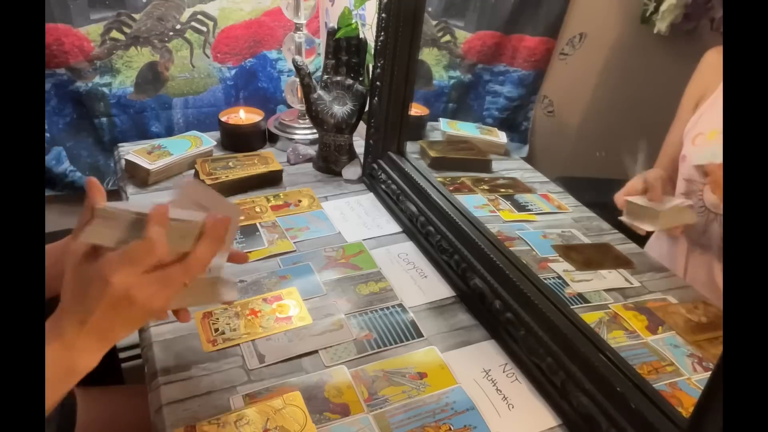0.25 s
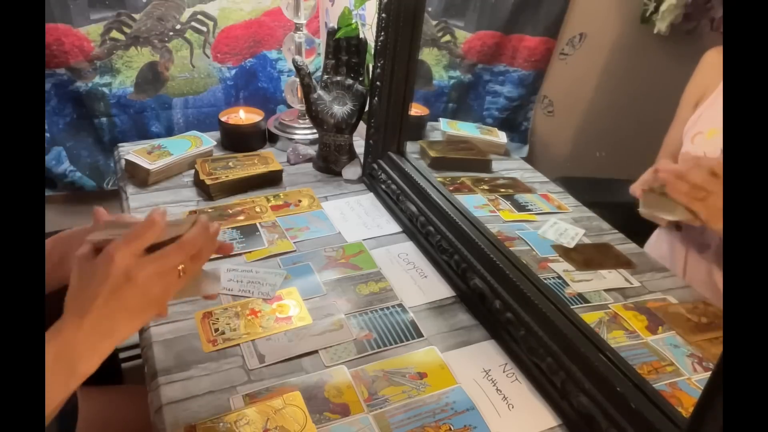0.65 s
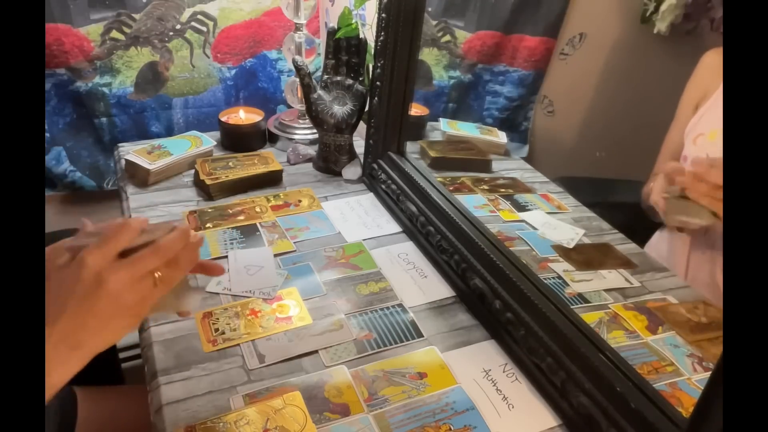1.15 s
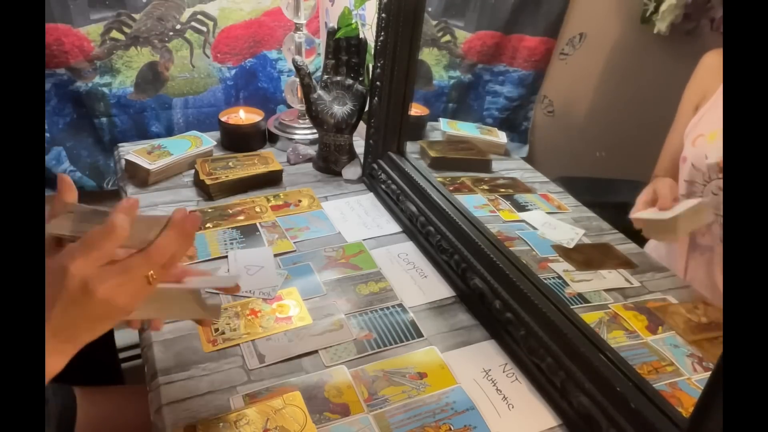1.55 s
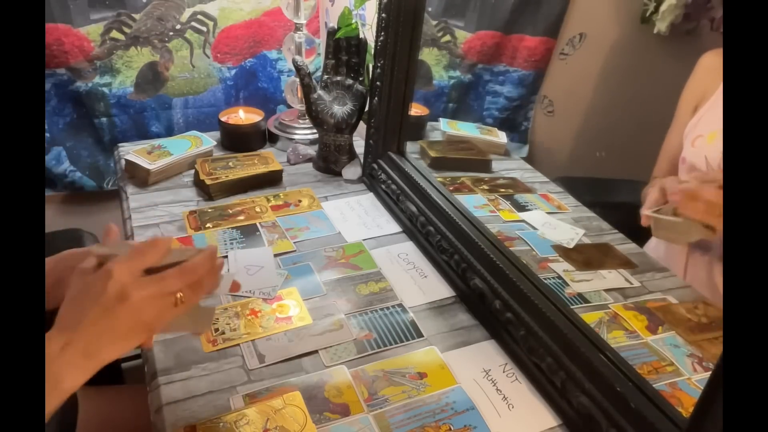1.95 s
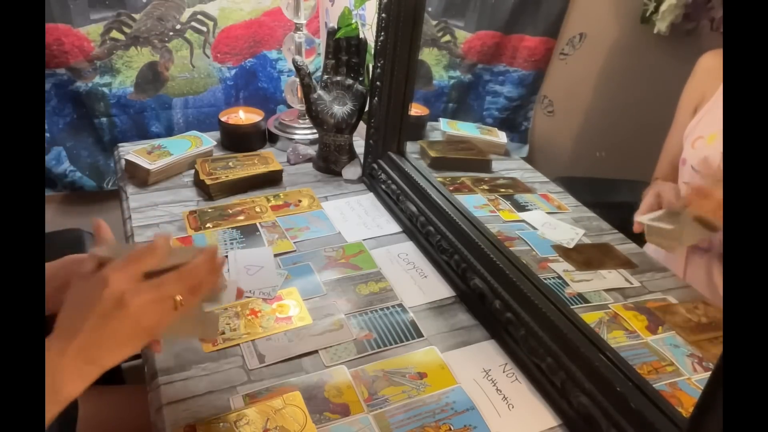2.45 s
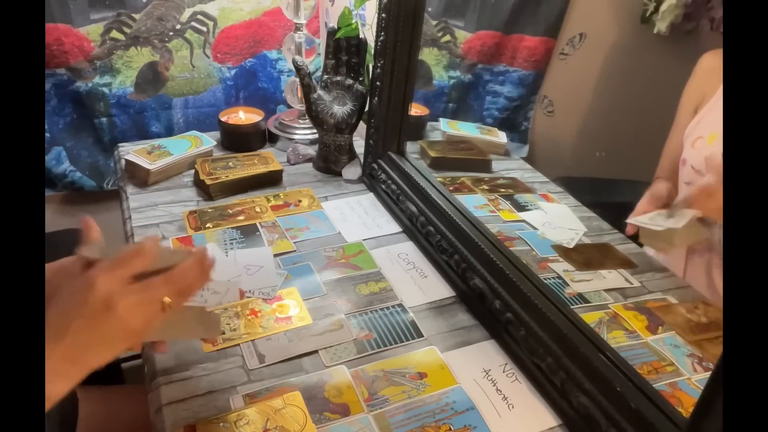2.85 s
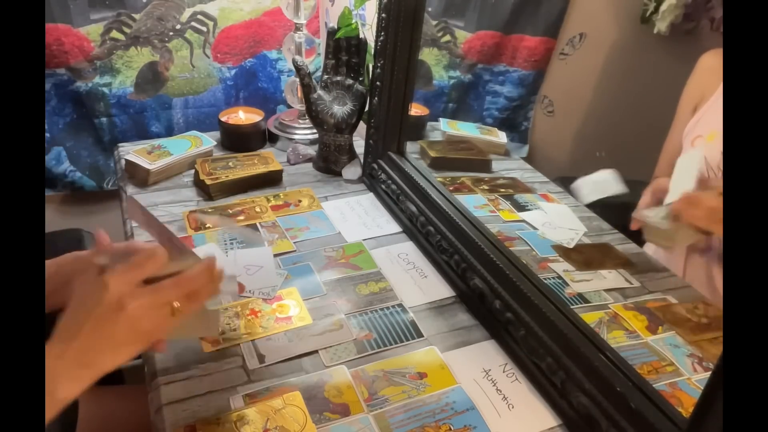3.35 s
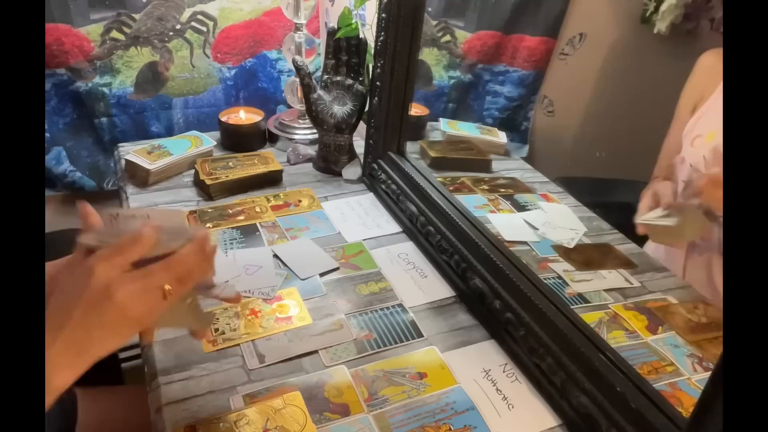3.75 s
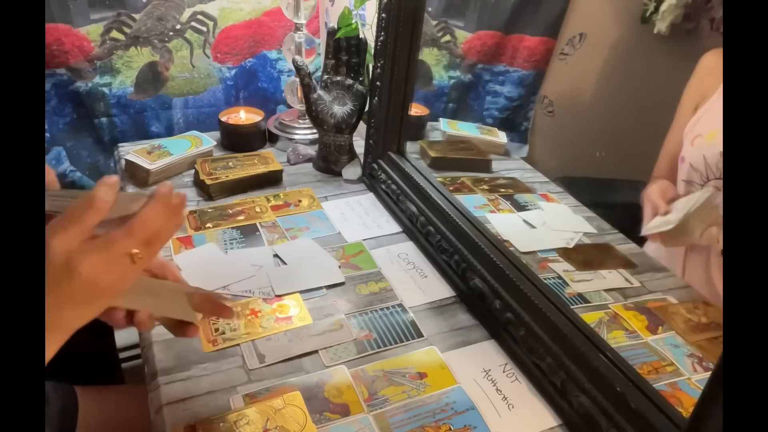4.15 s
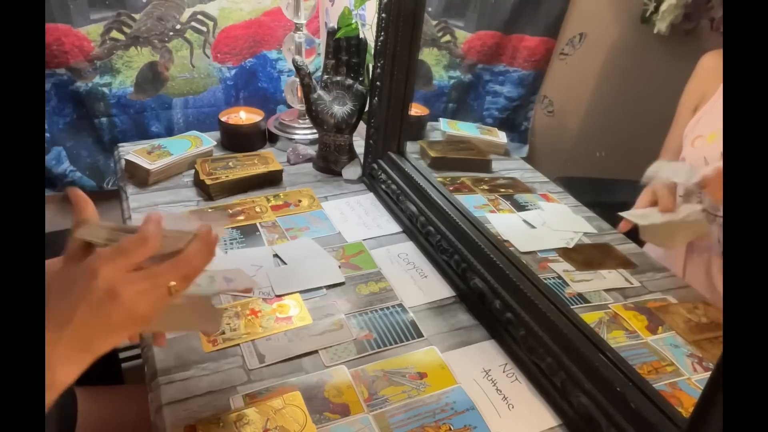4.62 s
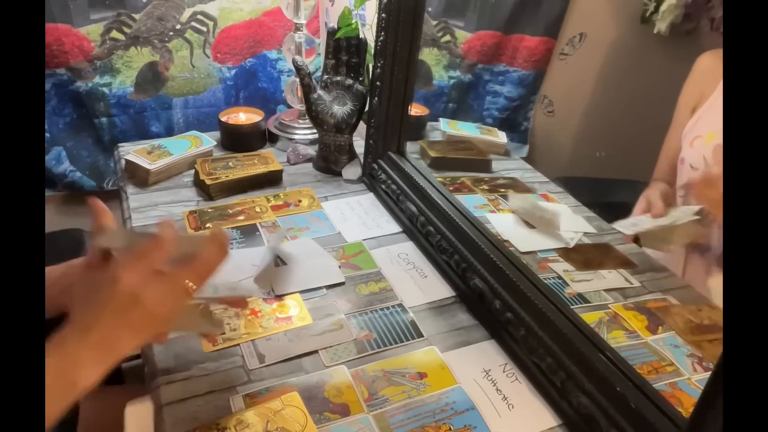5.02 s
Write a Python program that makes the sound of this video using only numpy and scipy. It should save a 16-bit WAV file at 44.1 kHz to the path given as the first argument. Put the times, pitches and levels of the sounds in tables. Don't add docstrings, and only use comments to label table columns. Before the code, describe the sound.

Hands work a deck of big cards: finger grip, scratchy slide, crisp slap, over and over at about four a second. Slaps are papery and mid-pitched with bright edge snaps and a faint wooden thud beneath. The handfuls thin out late, one strong crack sounds, light ticks follow, and a dull hollow knock closes. Close stereo phone pickup, short room reflections, almost no background noise.

```python
import sys
import numpy as np
from scipy import signal
from scipy.fft import rfft, irfft, next_fast_len
from scipy.io import wavfile
from scipy.ndimage import uniform_filter1d

SR = 44100
rng = np.random.default_rng(int(sys.argv[2]) if len(sys.argv) > 2 else 0)


def magnitude_from_level(level_db):
    exponent = np.asarray(level_db, float) / 20
    return 10 ** exponent


def dump(signal):
    limited = np.clip(np.atleast_2d(signal).T, -1, 1)
    pcm = np.round(limited * 32767).astype(np.int16)
    wavfile.write(sys.argv[1], SR, pcm)


N = 232888
PADDED = next_fast_len(N + 2 ** 12)
HZ = np.maximum(np.fft.rfftfreq(PADDED, 1 / SR), 1)
PLACES = 11


def at_hz(table, hz=HZ):
    table_hz, value = np.transpose(table)
    return np.interp(np.log(hz), np.log(np.maximum(table_hz, 1)), value)


def band(x, lo_hz, hi_hz, order=2):
    edges = [lo_hz, min(hi_hz, .45 * SR)]
    return signal.sosfilt(signal.butter(order, edges, "bandpass", fs=SR, output="sos"), x)


def around(x, hz, width_hz, order=2):
    return band(x, hz - width_hz / 2, hz + width_hz / 2, order)


def unit(x):
    return x / np.sqrt(np.mean(x ** 2))


def crest(x, db):
    return x * magnitude_from_level(db) / np.sqrt(uniform_filter1d(x ** 2, size=176).max())


def dying(t, t60):
    return np.exp(-np.log(1000) * t / t60)


def grit(size, spread_db):
    return rng.standard_normal(size) * magnitude_from_level(spread_db * np.minimum(rng.exponential(size=size), 3.5))


# pitch in Hz, share common to both from 0 to 1.
PORT_LIKENESS = [(60, .95), (130, 0.98), (300, 0.82), (800, 0.56), (2000, 0.51), (4000, 0.43), (6500, 0),
                 (9000, 0), (11500, 1), (15000, 0.9)]
# pitch in Hz, lead of the left port in radians.
PORT_LEAD = [(0, 0), (900, .2), (1380, .6), (2240, 2.2), (2840, 4.0), (3790, 5.4), (5000, 8.4),
             (6550, 10.4), (8500, 12.2), (12900, 12.8), (14100, 15.3), (16300, 15.9)]
# pitch in Hz, left minus right in dB.
PORT_TILT = [(60, .5), (200, 2), (380, 4), (700, 6), (1290, 1.5), (2380, -2.5), (4400, 0), (6000, 3),
             (8120, 0)]


def ports(common, left, right):
    share = np.clip(at_hz(PORT_LIKENESS), 0, 1)
    lead = np.interp(HZ, *np.transpose(PORT_LEAD))
    half = magnitude_from_level(at_hz(PORT_TILT) / 2) * np.exp(.5j * lead)
    pair = np.sqrt(share) * common + np.sqrt(1 - share) * np.array([left, right])
    return irfft(pair * np.array([half, 1 / half]), PADDED)[:, :N]


# pitch in Hz, density in dB per Hz.
FLOOR_COLOUR = [(24, -40), (40, 10.5), (108, -20), (1170, -30.5), (1460, -21), (1610, -38.5), (4450, -28.5),
                (15000, -36)]


def room_tone():
    noise = rfft(rng.standard_normal((3, N)), PADDED) * magnitude_from_level(at_hz(FLOOR_COLOUR))
    return unit(ports(*noise)) * magnitude_from_level(-72)


# pitch in Hz, time to fall 60 dB in seconds.
ROOM_DECAY = [(100, 0.23), (500, 0.24), (2000, 0.26), (5000, 0.25), (12000, 0.23312)]
# pitch in Hz, late sound against direct in dB.
ROOM_LEVEL = [(100, -3), (500, -6), (2000, -3), (5000, -2.5), (12000, -10)]


def room_response():
    t = np.arange(24000) / SR
    near = rng.standard_normal(len(t)) * dying(t, 0.047)
    wall = rng.standard_normal(len(t)) * np.exp(-abs(t * 1000 - 8.4) / 1.86)
    late = magnitude_from_level(-16) * wall / np.sqrt(np.sum(wall ** 2))
    for hz in 70 * 2. ** np.arange(8):
        shape = dying(t, at_hz(ROOM_DECAY, hz)) * np.clip(t / 0.009375, 0, 1)
        low = hz / np.sqrt(2)
        top = hz * (np.sqrt(2) if hz < 8000 else 2.2)
        noise = unit(band(rng.standard_normal(len(t)), low, top)) * np.sqrt((top - low) * 2 / SR)
        late = late + magnitude_from_level(at_hz(ROOM_LEVEL, hz)) * noise * shape / np.sqrt(np.sum(shape ** 2))
    return magnitude_from_level(-4.5) * near / np.sqrt(np.sum(near ** 2)) + late


# pitch in Hz, width in Hz, level in dB.
PANEL_BOOM = [(126.6, 24.6, 26), (154.5, 33, -11)]
# pitch in Hz, width in Hz, level against the boom in dB.
PANEL_KNOCK = [(292.46, 95, -13), (447, 68, -20), (527, 82, -6.5), (607, 78, -11.5), (1794, 240, -21)]


def panel_mode(x, hz, width_hz, db):
    return crest(band(around(x, hz, width_hz, order=1), hz - width_hz, hz + width_hz, order=1), db)


def knock():
    knock_s, boom_late_s, heel_late_s, heel_ms = 5.186, 0.014, 0.0058, 1.2
    t = np.clip(np.arange(N) / SR - knock_s, 0, None)
    corner = band(t * np.exp(-t * 1000 / heel_ms), 199.6, 6000)
    late = np.zeros(N)
    late[int((knock_s + boom_late_s) * SR)] = 1
    boom = sum(panel_mode(late, *mode) for mode in PANEL_BOOM)
    blow = corner + np.roll(corner, int(heel_late_s * SR))
    upper = sum(panel_mode(blow, *mode) for mode in PANEL_KNOCK)
    return magnitude_from_level(-33.5) * np.array([crest(boom, 0), upper])


# pitch in Hz, width in Hz, level in dB.
CARD_MODES = [(502, 120, 17), (1001, 724, 21), (1406, 470, 20), (2106, 380, 19), (3680, 810, -8.5),
              (4540, 700, -6.5)]


def card_body(x, stretch=0.77):
    return sum(magnitude_from_level(db) * around(x, stretch * hz, width, order=1) for hz, width, db in CARD_MODES)


# start in seconds, length in seconds, rub as the faces
# break loose in dB, rub once gliding in dB, edge hiss at full speed in dB.
DRAG_STROKES = [(0.105, 0.09, -58, -51, -45.5), (0.389, 0.069, -53, -45, -34.5),
                (0.29, 0.059, -74, -51.5, -59), (0.612, 0.11, -55, -52, -43.5),
                (0.729, 0.16, -32.5, -74, -56), (1.13, 0.15, -71, -55.5, -41.5),
                (1.246, 0.17, -35, -48.5, -61), (1.374, 0.14, -26, -60, -45),
                (1.664, 0.088, -47.5, -61, -41.5), (1.904, 0.14, -43, -64, -38.5),
                (2.148, 0.11, -55, -51.5, -41.5), (2.38, 0.15, -33, -60, -42),
                (2.632, 0.099, -40, -63.5, -47), (2.883, 0.083, -61.5, -45.5, -49),
                (3.124, 0.097, -45, -57, -45), (3.254, 0.088, -46, -61, -66),
                (3.346, 0.13, -41, -47.5, -56), (3.574, 0.076, -49, -74.5, -53),
                (3.673, 0.12, -34.5, -67, -43), (3.831, 0.17, -48, -58, -59.5),
                (4.027, 0.093, -47, -55.5, -51.5), (4.288, 0.081, -75.5, -56.5, -43),
                (4.505, 0.11, -48, -54, -37.5), (4.866, 0.065, -34.5, -68, -64.5),
                (5.008, 0.046, -63, -74.5, -64), (5.09, 0.028, -66, -67, -77),
                (5.149, 0.037, -69, -64, -66), (0.803, 0.055, -42, -55, -56),
                (0.872, 0.13, -36.5, -76, -38)]
# landing in seconds, rub in dB, hiss in dB.
LANDING_RUSHES = [(0.202, -38.5, -41.5), (0.4498, -35, -53), (0.726, -40.5, -41.5), (.9558, -40, -41.5),
                  (1.2587, -34, -35), (1.479, -35.5, -42.5), (1.7616, -43.5, -41), (1.998, -38, -39),
                  (2.4813, -40, -33.5), (2.736, -44.5, -45), (3.237, -43.5, -46), (3.517, -33.5, -33.5),
                  (3.776, -43.5, -48.5), (4.383, -47, -41.5), (4.609, -39, -46)]


def drag():
    loosen_db_per_s, speed_up_db, break_hiss_db, rush_swell_s = 383, 17, -29.5, 0.015
    t, rub, hiss = np.arange(N) / SR, np.zeros(N), np.zeros(N)
    for s, length, loose_db, glide_db, hiss_db in DRAG_STROKES:
        on = slice(int(s * SR), int((s + length) * SR))
        since = t[on] - s
        loose = magnitude_from_level(loose_db - loosen_db_per_s * since)
        rub[on] += loose + magnitude_from_level(glide_db)
        hiss[on] += loose * magnitude_from_level(break_hiss_db) + magnitude_from_level(hiss_db - speed_up_db * (1 - since / length))
    for s, rub_db, hiss_db in LANDING_RUSHES:
        on = slice(int(s * SR) - 2 ** 13, int(s * SR))
        rush = np.exp((t[on] - s) / rush_swell_s)
        rub[on] += rush * magnitude_from_level(rub_db)
        hiss[on] += rush * magnitude_from_level(hiss_db)
    return rub, hiss


def slide():
    rub_gain, hiss_gain = drag()
    steps = np.repeat(rng.standard_normal(N // 300 + 1), 300)[:N]
    catch = unit(uniform_filter1d(steps, size=200))
    grain = unit(band(grit(N, spread_db=6.0), 1800, 5000, order=1))
    faces = unit(card_body(grit(N, spread_db=4.0))) + magnitude_from_level(-9.5) * grain
    edges = unit(band(grit(N, spread_db=4.5), 4600, 18000))
    rub = faces * rub_gain * magnitude_from_level(np.clip(4.4 * catch, -11, 4) - 8.5)
    hiss = edges * hiss_gain * magnitude_from_level(np.clip(3.5 * catch, -8, 3) - 3.0)
    return rub + hiss


# pitch in Hz, level in dB, time to fall 60 dB in seconds.
TABLE_MODES = [(149, -9, 0.093), (193, 5.5, 0.03), (242, 9, 0.028)]


def table_top():
    t = np.arange(8192) / SR
    return sum(magnitude_from_level(db) * np.sin(2 * np.pi * hz * t) * dying(t, t60) for hz, db, t60 in TABLE_MODES)


# start in seconds, thump in dB.
PACKET_THUDS = [(.2067, -36.5), (.4482, -32), (.7281, -39), (.9564, -34.5), (1.2551, -39), (1.3627, -39.5),
                (1.3991, -37.5), (1.4811, -36.5), (1.7643, -35.5), (1.912, -50.5), (2.0, -31.5),
                (2.2486, -34.5), (2.4796, -36), (2.7372, -37.5), (2.974, -33.5), (3.237, -45.5),
                (3.52, -42.5), (3.7755, -41), (4.045, -59.5), (4.3865, -34), (4.6091, -36), (4.722, -37),
                (4.9261, -49.5), (4.96, -56), (4.943, -43.5), (4.994, -58.5), (5.016, -56), (5.044, -61)]


def add_thuds(out, lead, table):
    fade = np.exp(-np.arange(2048) / SR * 1000 / 6.1)
    for n, (s, db) in enumerate(PACKET_THUDS):
        shove = band(rng.standard_normal(2048) * fade, 32, 320)
        thud = signal.fftconvolve(shove, table)[:8192]
        out[n % PLACES, int(s * SR) + lead:][:8192] += crest(thud, db - 3.0)


# start in seconds, strength in dB, flex against it in dB,
# edge snap against it in dB, cluster length in ms.
PACKET_DROPS = [(0.2034, -36.5, 7, 4, 0.86), (0.2059, -24.5, -18, -7.5, 3.1), (0.4476, -27.5, 0, 6.5, 2.4),
                (.451, -23.5, 5.5, 7, 0.42), (0.7291, -24.5, -8, -8, 1.2), (0.7316, -35.5, -3, -16, 2.8),
                (0.9559, -22, 5, -2, 3.9), (0.961, -25.5, 5, 8, 2.8), (1.2558, -28.5, -1.5, 2, 1.5),
                (1.3588, -20.5, -1.5, -4, 3.8), (1.366, -22.5, 2.5, -6, 2.9), (1.3708, -36, -7, -12.5, 2.5),
                (1.3805, -25, 9.5, 10, 2.6), (1.3879, -33.5, 3, -17, 2.2), (1.402, -36.5, 10, -5, 3.6),
                (1.479, -26.5, 6.5, -5.5, 0.85), (1.4829, -14.5, -2.5, -8.5, 2.1),
                (1.7618, -28.5, -3, 3.5, 7), (1.7657, -20, 1, -6, 1.35), (1.9989, -19.5, -0.5, -4.5, 5.9),
                (2.004, -19, 6, -16.5, 2.2), (2.2491, -21.5, -6, -3.5, 2.4), (2.2534, -20.5, -1.5, -3, 1.9),
                (2.4793, -24.5, 1, 2, 3.3), (2.484, -28, 5.5, 11.5, 0.45), (2.737, -28, -3, 0, 3),
                (2.7426, -24.5, -7, 0, 6.2), (2.974, -23, 1.5, -11.5, 3.7), (2.9793, -20.5, -12, 10, 2.5),
                (3.238, -42, 3.5, 6, 2.2), (3.2398, -38, -5, -8, 4.3), (3.7761, -23, -2, -2.5, 2.2),
                (4.384, -35.5, 10, 10.5, 6.2), (4.39, -24, -5, 8, 0.73), (4.6095, -21.5, -7, -18.5, 0.78),
                (4.72, -19.5, -7, 2.5, 1.7), (4.724, -15.5, 0, -10.5, 2.2), (4.728, -19, -17, -9.5, 6.5)]
FURTHER_DROPS = [(.22, -32.5, -16, -25, 2.7), (0.2236, -38, -25, -18, 1.4), (0.23, -44.5, -13.5, -17.5, 4),
                 (0.3743, -33, -1, -0.5, 3), (.378, -30.5, -7, -10.5, 1.3), (0.7403, -34.5, -15, -11, 2.4),
                 (0.8054, -37, 3.5, 2, 4), (.869, -29.5, 0, -7, 6.1), (0.882, -38.5, -8.5, -16, 2.1),
                 (0.89, -43, -5, -13, 2.2), (1.522, -46, 1, 2, 5.4), (1.91, -37.5, 0, 2, 3.7),
                 (1.916, -40, 0.5, 4.5, 3.9), (1.992, -48, 4.5, 3.5, 1.7), (2.023, -34.5, -1.5, -7, 9.2),
                 (2.2803, -34, -7, -15.5, 1.3), (2.296, -42.5, -7, -6, 4.3), (2.4, -40.5, 0, 2.5, 3.4),
                 (2.409, -39.5, -4.5, 3, 1.81), (2.4104, -30.5, 4.5, -19.5, 1.7), (2.7454, -23, 0, -18, 3.3),
                 (2.909, -21.5, 0.5, 7.5, 1), (3.3562, -37.5, -14, -2.5, 1.5), (3.3606, -31, -9.5, -1.5, 2.5),
                 (3.3834, -34.5, 3, -12, 2.8), (3.4153, -34, 5, -5.5, 3.1), (3.419, -27.5, -1, -6.5, 3.6),
                 (3.518, -21, 1.5, -4, 6.9), (3.525, -25, 3.5, 9, 2.4), (3.6365, -25, -2, -12.5, 9.1),
                 (3.642, -24.5, -13.5, -7.5, 2.4), (3.648, -36.5, 6.5, 6, 7.5),
                 (3.675, -31.5, 0.5, -0.5, 1.5), (3.678, -40.5, -5, 4, 2.9), (4.523, -43.5, 0, 1.5, 4.096),
                 (4.526, -41.5, 0, -7, 2.7), (4.986, -49.5, -5, 9, 9.8), (4.993, -50.5, -14, -1, 3),
                 (5.0402, -50.5, -4.5, 12, 2.3), (5.185, -49, -14, -3.5, 2.8)]
# start in seconds, strength in dB, edge snap against it in dB,
# cluster length in ms.
FINGER_GRIPS = [(0.107, -38, -6, 2.9), (0.302, -43, -5, 1.8), (0.6161, -43, -3, 5), (0.66, -40.5, -22, 2),
                (1.1365, -42, -8, 1.6), (1.198, -49.5, 1, 14), (1.3328, -37.5, -0.5, 3.1),
                (1.67, -38.5, -11.5, 2.4), (1.7, -35, -5, 1.5), (2.151, -42, -7.5, 7.4),
                (2.381, -48, 0.5, 2.5), (2.6364, -46, 10, 4.9), (2.884, -49, -8.5, 6.7),
                (3.1265, -42, -4.5, 8.9), (3.1302, -37, -7, 2), (3.348, -48.5, -13.5, 5.2),
                (3.484, -46.5, 2.5, 6.7), (3.4895, -37, -1, 5.6), (3.8618, -49.5, -11.5, 24),
                (3.951, -44.5, -7, 11.7), (4.0424, -50, -22, 13.6), (4.2818, -50, -8, 11.66),
                (4.794, -38.5, -10, 4.6), (4.8674, -43, -4, 7.5), (4.9265, -40.5, 6, 0.95)]
# start in seconds, strength in dB, edge snap against it in dB.
CORNER_TICKS = [(0.054, -55, 11.5), (0.125, -43, 1), (0.139, -48, -13), (0.1445, -47.5, 0),
                (0.2863, -64, 12), (0.3438, -39.5, -5.5), (0.401, -51, 2), (0.4402, -46, -4),
                (0.63, -51.5, 5), (0.6416, -54.5, 6), (0.789, -57.5, 9.5), (0.846, -41, -9),
                (0.863, -50, 2), (0.939, -52.5, 9.5), (1.088, -56, 10.5), (1.1643, -55, 10.5),
                (1.305, -45.5, -14.5), (1.326, -51.5, 4), (1.427, -32, -15), (1.469, -56.5, 9.5),
                (1.604, -58, 8), (1.681, -54, 2.5), (1.81, -47.5, 9), (1.884, -57.5, 10),
                (2.187, -55.5, -5), (2.212, -50, 4), (2.4355, -49.5, -13), (2.4712, -32.5, -3.5),
                (2.536, -44.5, -11), (2.6238, -44, -4.5), (2.6567, -56, 9.5), (2.675, -56.5, 8),
                (2.787, -41, -8), (2.904, -55, 13), (3.151, -50, 3), (3.17, -48.5, 8), (3.225, -44, 0),
                (3.259, -46, 5), (3.2737, -50, 4.5), (3.598, -39, -11.5), (3.742, -46.5, 3.5),
                (3.842, -50.5, -8), (3.867, -50.5, -6), (3.929, -54, 2), (4.071, -45, -12),
                (4.08, -58.5, 14), (4.087, -58, 3), (4.409, -41, 7.5), (4.507, -47, -3), (4.548, -51.5, 0),
                (4.699, -39, -2.5), (4.709, -36, -6.5), (4.9067, -46.5, -7)]


def landings():
    tick_ms = 2.8
    touches = FINGER_GRIPS + [row + (tick_ms,) for row in CORNER_TICKS]
    light = [(s, db, -0.5 + 0.94 * edge, edge, ms) for s, db, edge, ms in touches]
    rows = []
    for s, db, flex, edge, ms in PACKET_DROPS + FURTHER_DROPS + light:
        push_db = -53.5 + 0.24 * (db + 18.5)
        rows.append((s, db, push_db, db + flex, db + edge, ms))
    return rows


# start in seconds, body in dB, thump in dB, flick in dB,
# snap in dB, cluster length in ms.
EARLIER_LANDING = (-.03, -21, -36, -17, -26, 4)
# start in seconds, ring in dB, ring in Hz,
# slow bending against the body in dB, flex in Hz.
HANDFUL_VOICES = [(0.107, -44, 1020, -13, 3280), (0.206, -29.5, 1320, -8, 3020), (0.3, -34, 880, -15, 4000),
                  (0.374, -29.5, 1650, -12.5, 5000), (0.446, -18.5, 970, -16, 3957),
                  (0.616, -51, 1520, -9.5, 3409), (0.659, -35, 1530, -14, 3640),
                  (0.728, -24.5, 1540, -8, 3780), (0.805, -44, 1410, -23, 3060),
                  (0.869, -35, 1110, -15, 4160), (0.955, -23, 1630, -8, 4400), (1.136, -39, 1480, -8, 4510),
                  (1.255, -20.5, 1950, -11.5, 4531), (1.359, -21.5, 1420, -12, 4100),
                  (1.38, -20, 855, -13, 3200), (1.478, -15, 1910, -14, 3200), (1.669, -38, 1380, -4, 4100),
                  (1.699, -36, 1455, -27, 3010), (1.759, -27.5, 1430, -10.5, 4100),
                  (1.911, -33, 1370, -7, 4560), (1.998, -26, 1060, -15, 3330), (2.152, -37, 1010, -6, 4690),
                  (2.254, -15.5, 1390, -10, 4250), (2.4, -30.5, 1290, -13, 4340),
                  (2.479, -28.5, 1380, -8.5, 3430), (2.637, -36.5, 1830, -20, 3300),
                  (2.744, -37, 1587, -16, 4430), (2.909, -21, 1760, -17, 4400),
                  (2.974, -24.5, 950, -9, 3600), (3.127, -37.5, 1500, -7, 3800),
                  (3.236, -40, 1416, -1.5, 4260), (3.355, -31.5, 990, -11.5, 3702),
                  (3.414, -41, 1200, -19, 3960), (3.518, -17.5, 1040, -13.5, 4400),
                  (3.638, -21, 880, -10, 3270), (3.775, -22.5, 2070, -11.5, 4010),
                  (4.384, -19, 982, -10.5, 3993), (4.608, -26, 1700, -10.5, 4180),
                  (4.722, -8, 2230, -13, 3980), (4.926, -48.5, 1371, -5.5, 4760)]


def slaps():
    lead, table = 2 ** 11, table_top()
    out = np.zeros((PLACES + 1, lead + N + 8192))
    since_ms = (np.arange(2048) - 256) * 1000 / SR
    rows = np.array([EARLIER_LANDING] + landings())
    starts = np.array(HANDFUL_VOICES)[:, 0]
    handful = np.maximum(np.searchsorted(starts, rows[:, 0] + .008) - 1, 0)
    grains, thickness = grit((256, 2048), spread_db=4.0), rng.standard_normal(256)

    def cluster(grain, ms):
        fade_ms = max(ms, .2)
        return grain * np.exp(np.where(since_ms < 0, since_ms / 0.51, -since_ms / fade_ms))

    for n, (s, body_db, thump_db, flick_db, snap_db, ms) in enumerate(rows):
        _, ring_db, ring_hz, bend_db, flex_hz = HANDFUL_VOICES[handful[n]]
        contacts, edge = cluster(grains[n], ms), cluster(grains[n], ms * 0.71)
        blow = contacts + magnitude_from_level(20) * (since_ms == 0)
        body = card_body(blow, 2 ** np.clip(0.072 * thickness[n], -.3, .3))
        belly = np.roll(band(body, 279.6, 865), int(2.503 * SR / 1000))
        flex = unit(band(blow, 3010, 4740)) + magnitude_from_level(-2.5) * unit(around(blow, flex_hz, 940))
        loudest_db = rows[handful == handful[n], 1].max()
        ring = crest(around(blow, ring_hz, 520), ring_db - 11.5 + body_db - loudest_db)
        push = signal.fftconvolve(band(contacts, 47, 400), table)[:8192]

        k, place = int(s * SR) + lead - 256, out[n % PLACES]
        place[k:k + 2048] += crest(band(body, 817, 2400), body_db - 5.5)
        place[k:k + 2048] += crest(belly, body_db + bend_db + 1)
        place[k:k + 2048] += crest(flex, flick_db - 7.0)
        place[k:k + 2048] += crest(band(edge, 7100, 26300), snap_db - 2.5)
        place[k:k + 8192] += crest(push, thump_db - 2.0)
        place[k:k + 2048] += magnitude_from_level(-7) * ring
        out[PLACES, k:k + 2048] += magnitude_from_level(-1.5) * ring
    add_thuds(out, lead, table)
    return out[:, :lead + N], lead


def scene():
    cards, lead = slaps()
    cards, rings = cards[:PLACES], cards[PLACES, lead:]
    turn = np.arange(N) / SR / 0.066
    away = abs((turn - np.arange(PLACES)[:, None] + 3) % PLACES - 3)
    cards[:, lead:] += slide() * np.cos(np.pi / 2 * np.clip(away, 0, 1))
    boom, upper = knock()
    cards[0, lead:] += upper
    paths = np.array([boom, 0 * boom, 0 * boom]) + rings
    for place in cards:
        for path in paths:
            response = room_response()
            response[rng.integers(0, 6)] += 1.14 * rng.choice([1, -1])
            path += signal.fftconvolve(place, response)[lead:lead + N]
    return ports(*rfft(paths, PADDED)) + room_tone()


# pitch in Hz, gain in dB.
MIC_COLOUR = [(110, 6.5), (1000, -1.5), (5000, 0.5), (7500, -1), (12000, -4.5), (14200, -3), (15200, -12),
              (16000, -19), (16500, -21.5), (17000, -42)]


def low_pass(x):
    return signal.sosfilt(signal.butter(12, 16670, fs=SR, output="sos"), x)


def record(dry):
    cut = signal.sosfilt(signal.butter(3, 95.0, "highpass", fs=SR, output="sos"), dry)
    mix = irfft(rfft(cut, PADDED) * magnitude_from_level(at_hz(MIC_COLOUR)), PADDED)[:, :N]
    return low_pass(mix)


dry = scene()
out = record(dry)
dump(out)
```